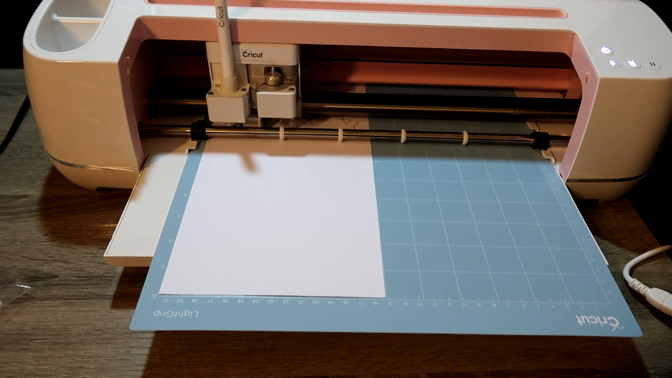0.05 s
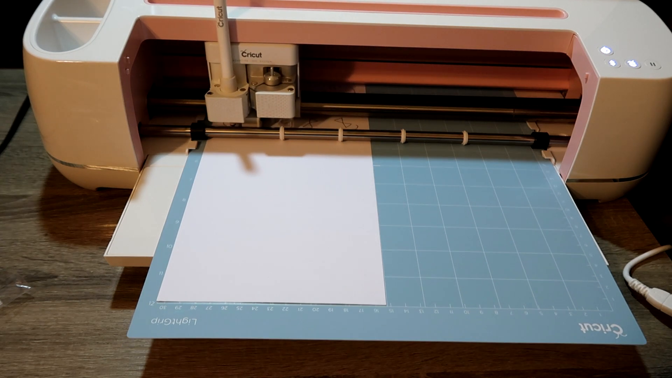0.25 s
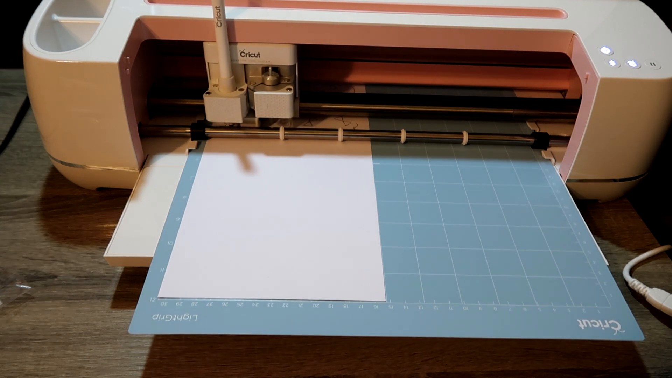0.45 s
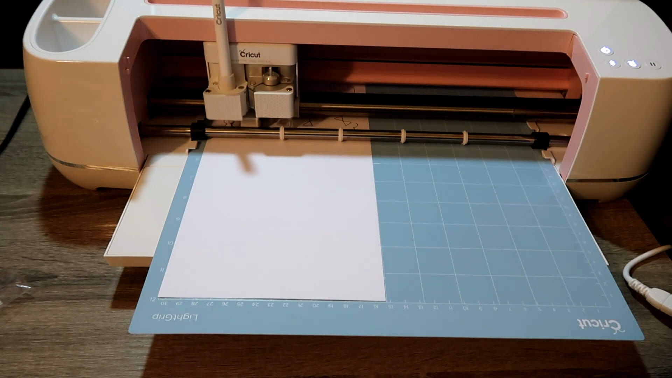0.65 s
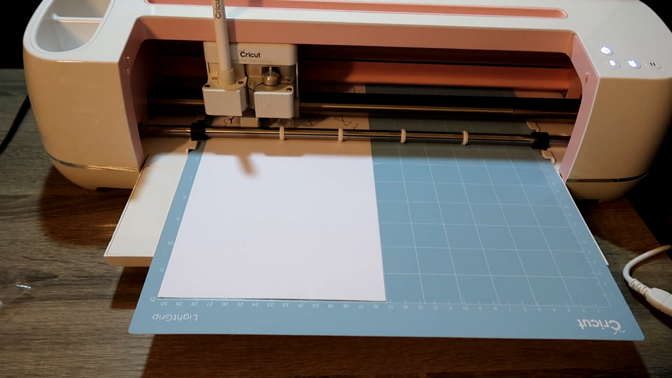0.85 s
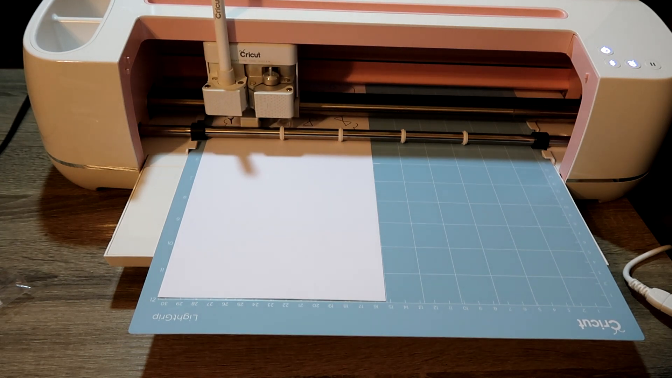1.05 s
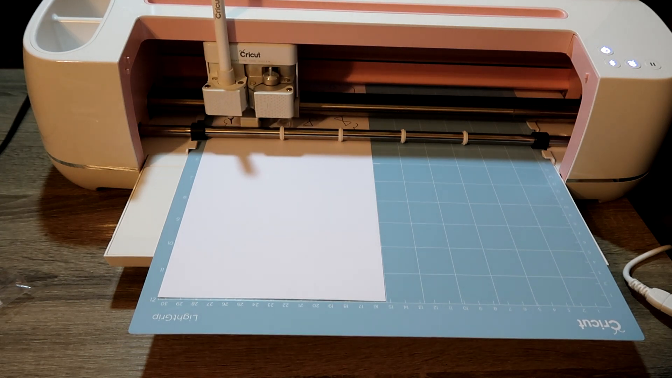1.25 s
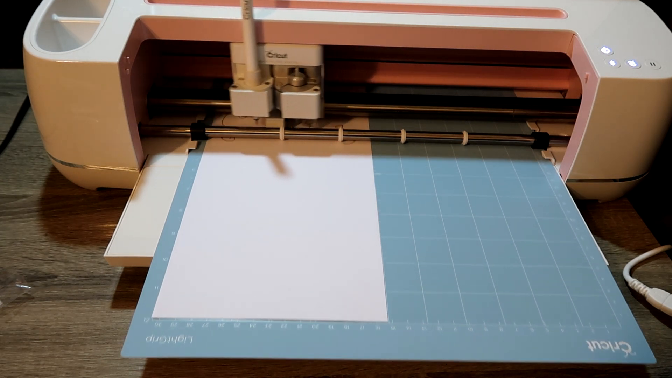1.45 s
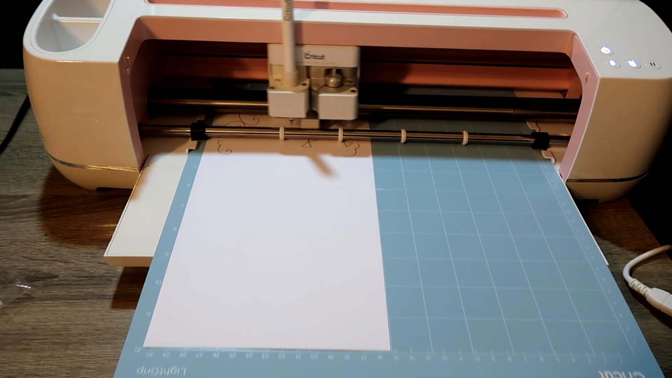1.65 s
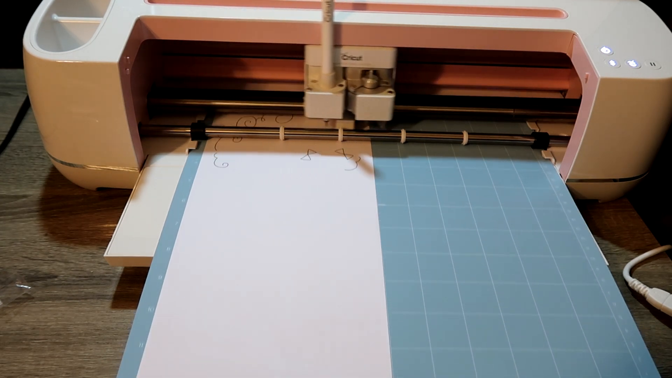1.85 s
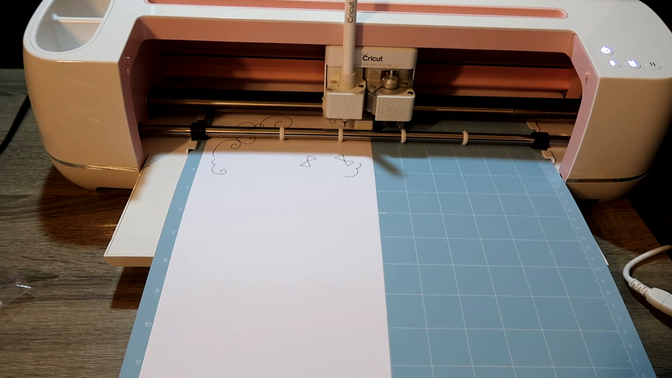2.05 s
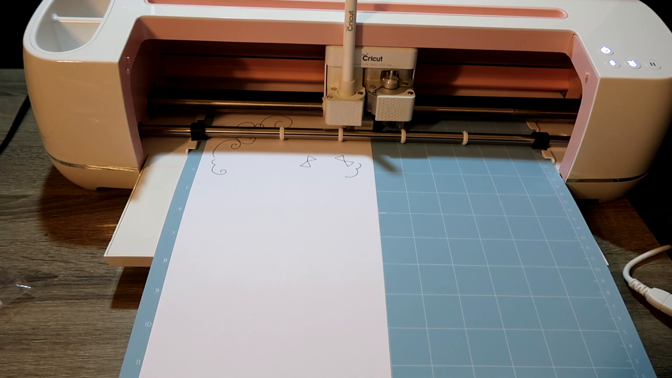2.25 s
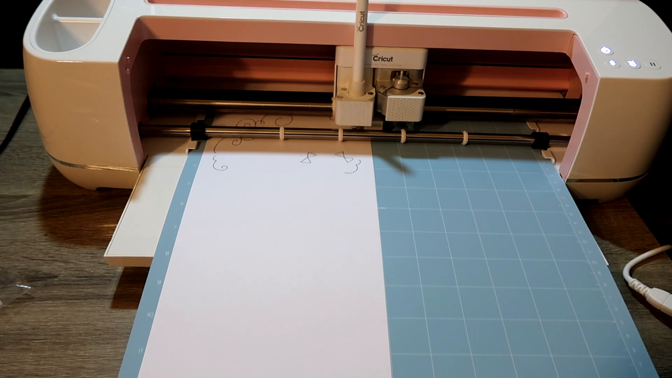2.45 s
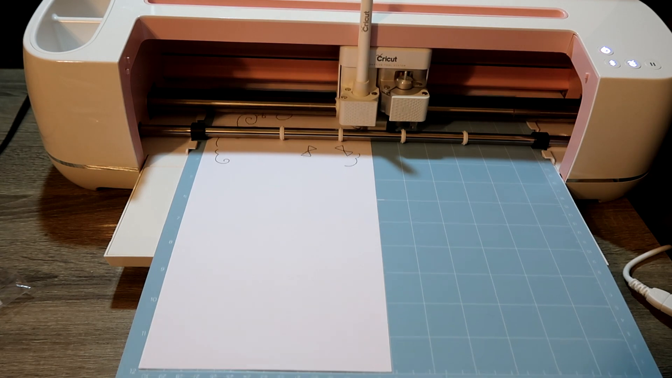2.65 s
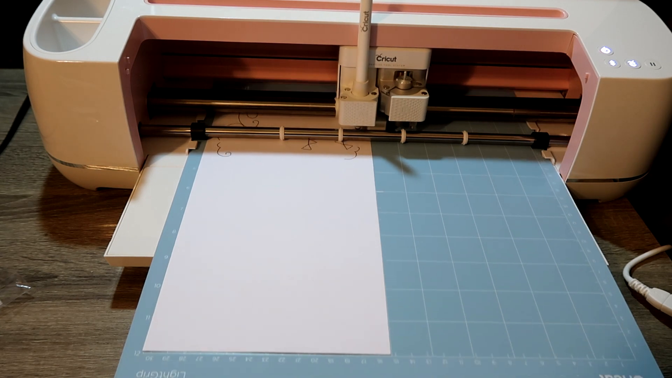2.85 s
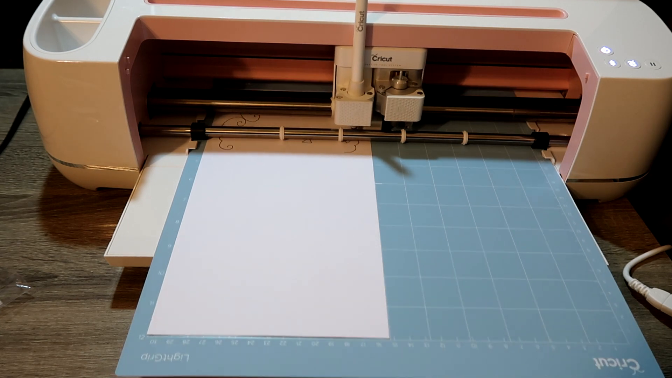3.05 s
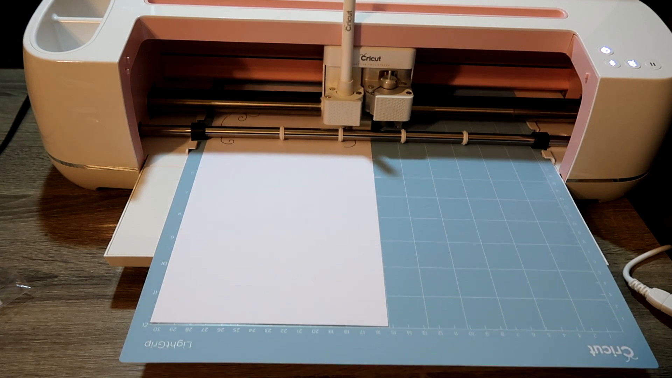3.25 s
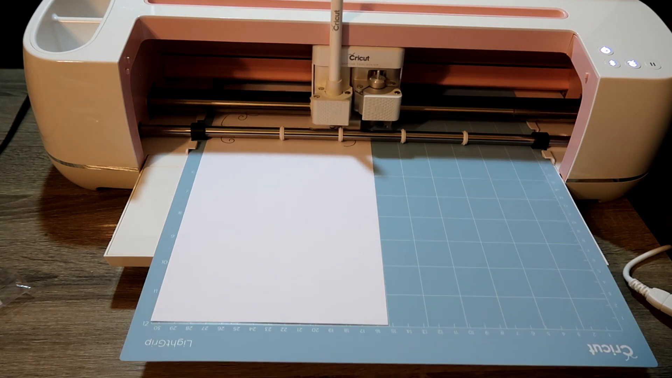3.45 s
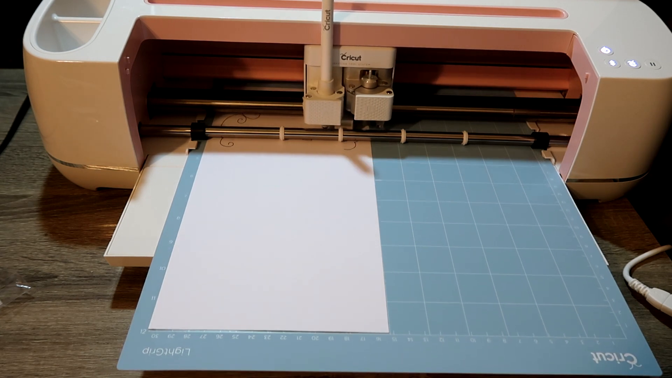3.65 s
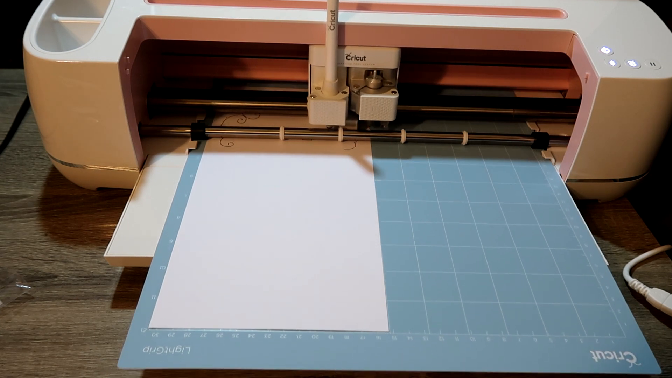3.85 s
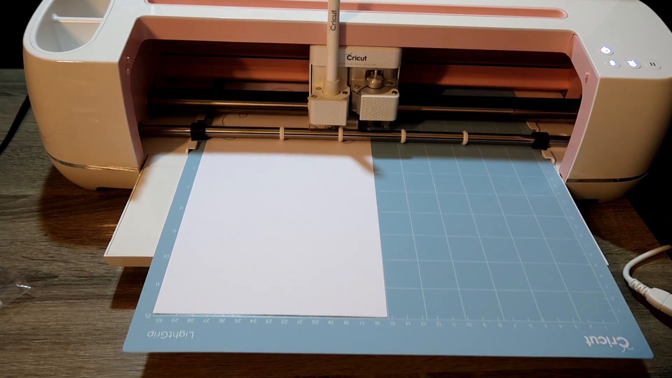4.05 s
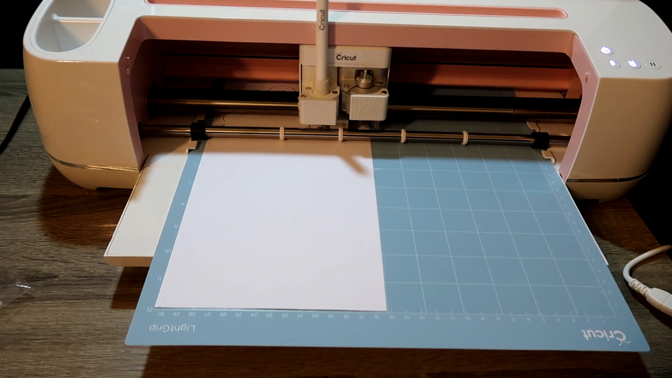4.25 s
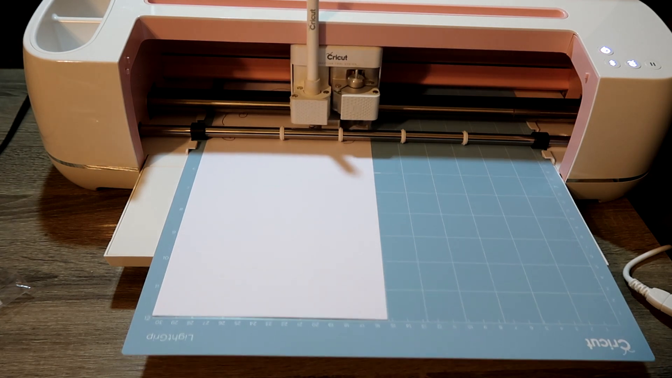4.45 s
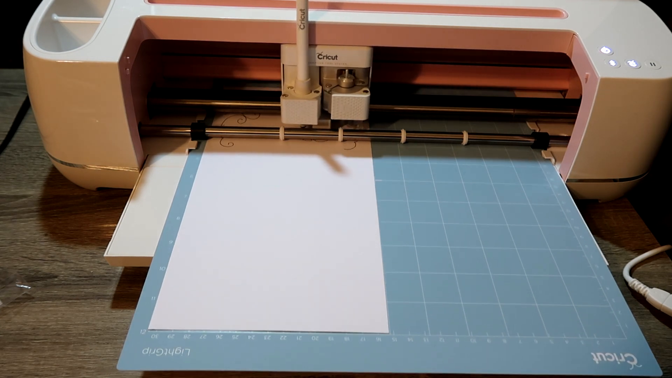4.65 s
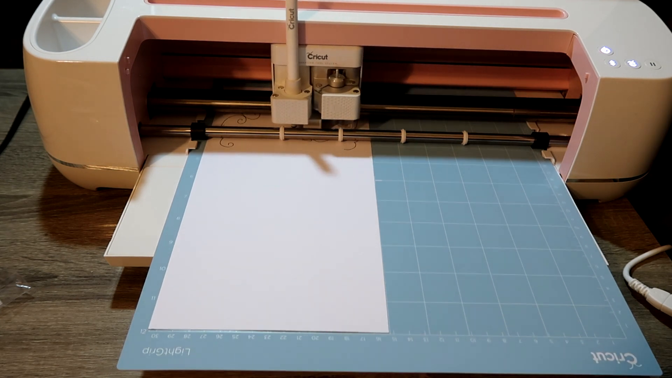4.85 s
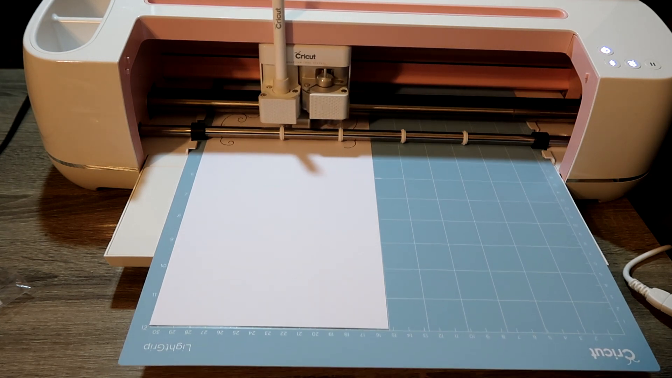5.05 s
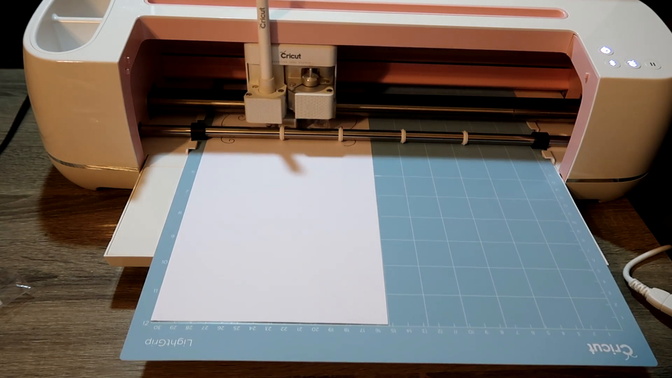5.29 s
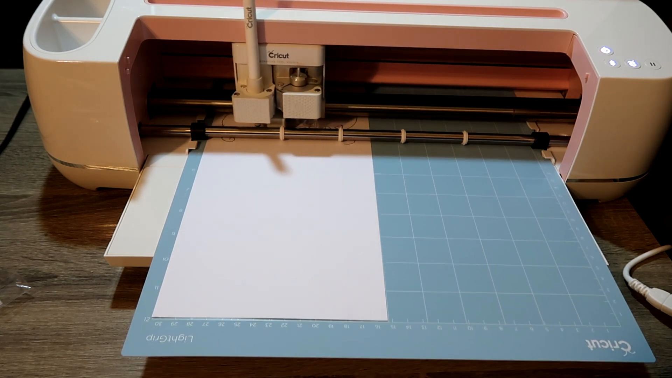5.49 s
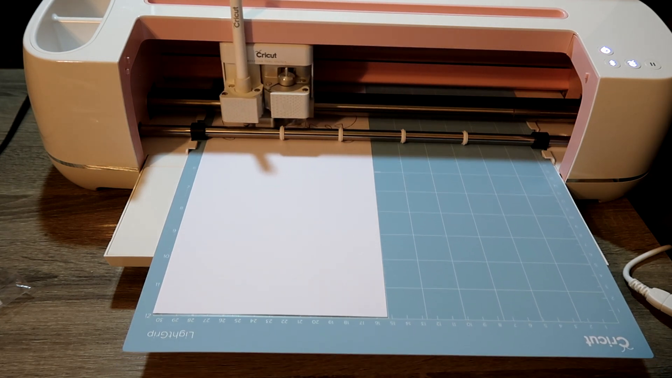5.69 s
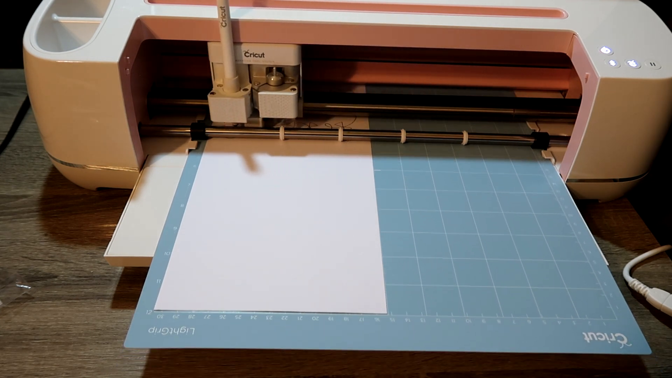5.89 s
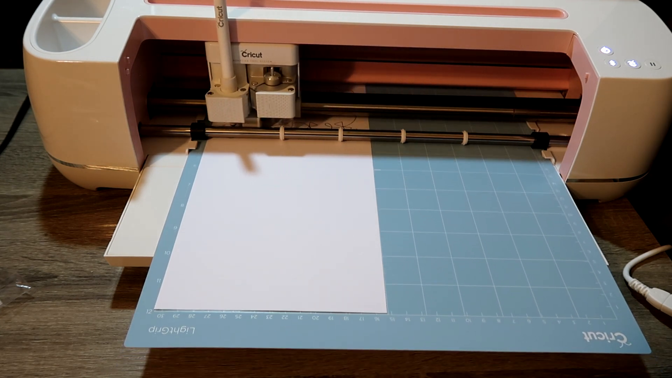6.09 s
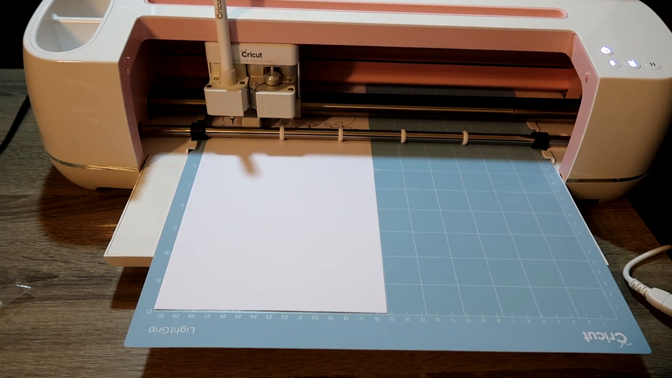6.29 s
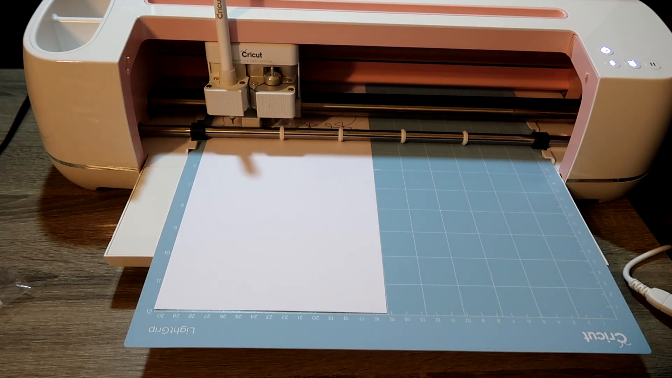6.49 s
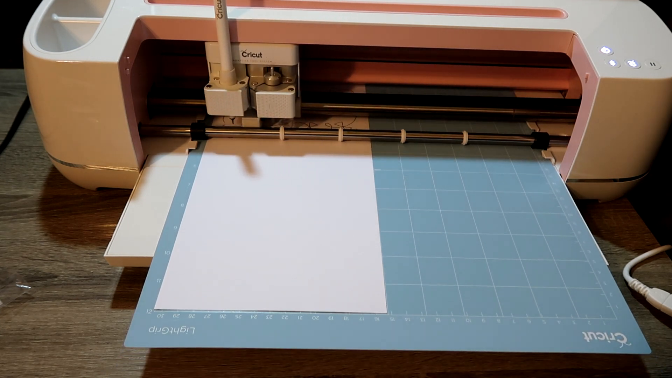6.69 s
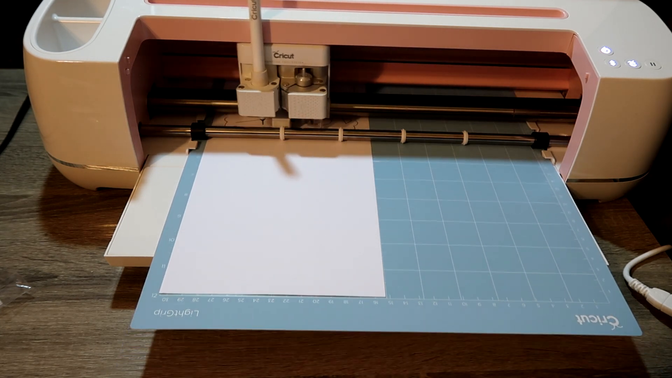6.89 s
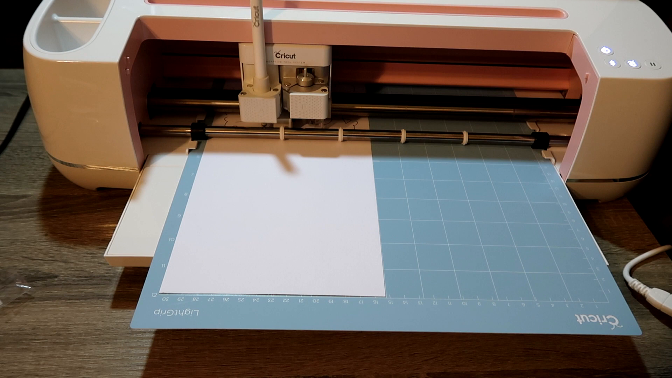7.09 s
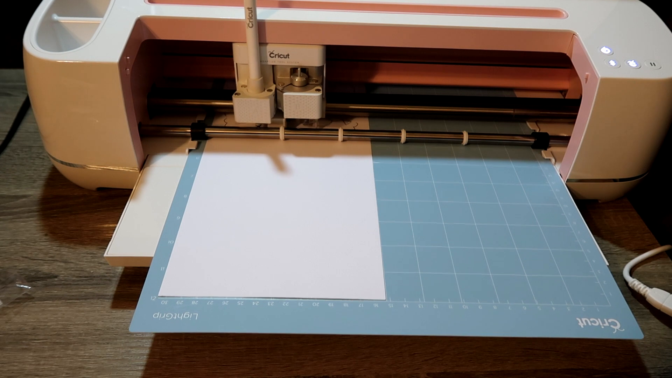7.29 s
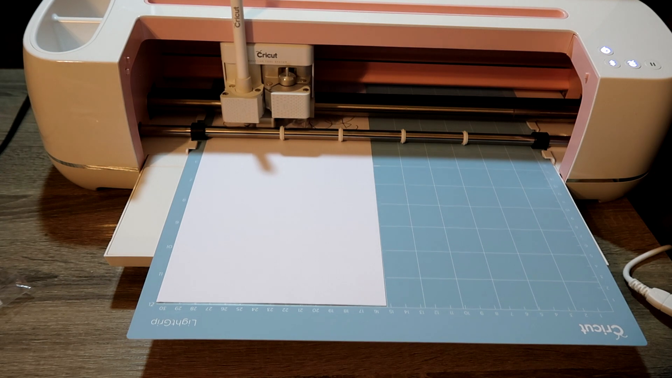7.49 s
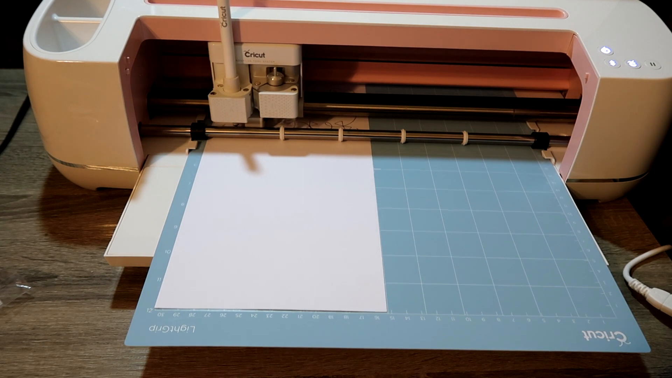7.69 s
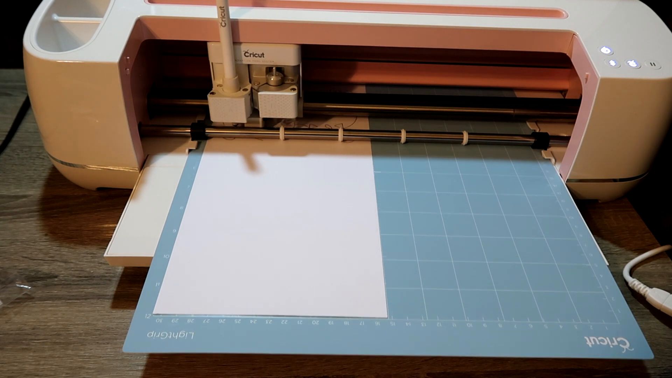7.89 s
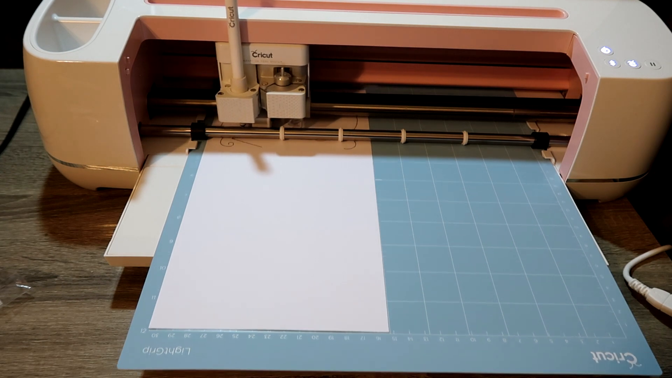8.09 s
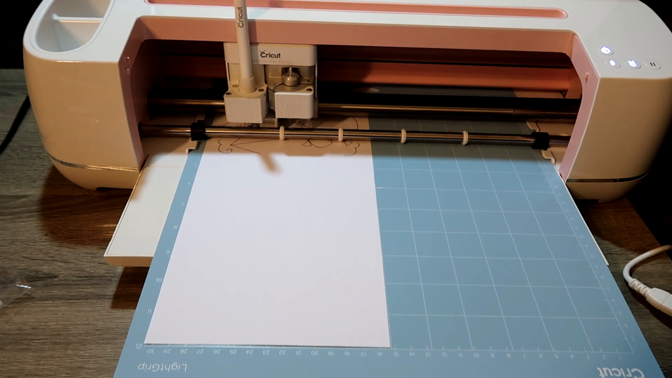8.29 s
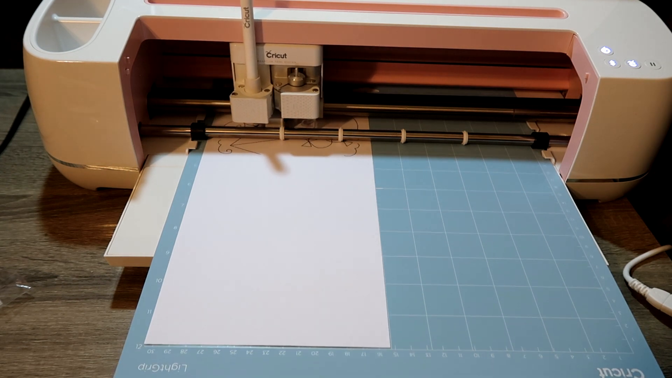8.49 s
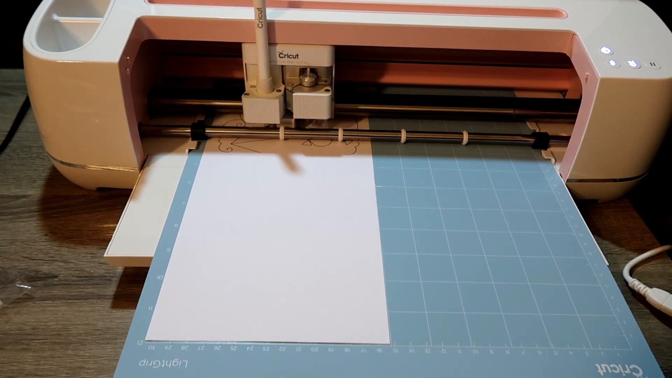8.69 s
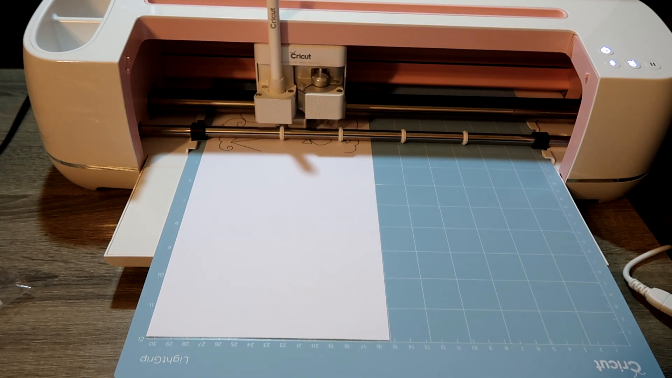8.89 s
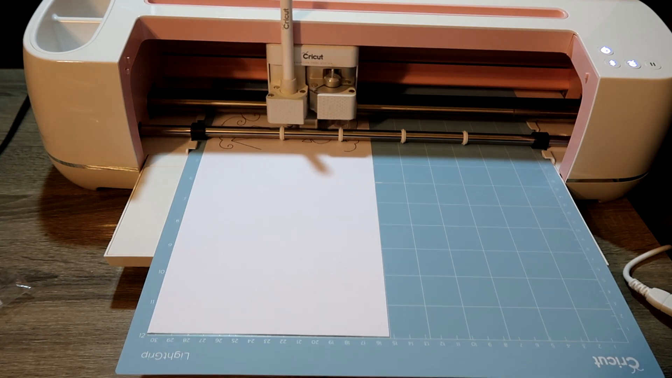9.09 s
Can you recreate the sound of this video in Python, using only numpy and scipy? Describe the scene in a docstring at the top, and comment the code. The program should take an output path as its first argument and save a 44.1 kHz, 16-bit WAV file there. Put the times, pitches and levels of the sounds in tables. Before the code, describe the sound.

Close up, small servo motors jog, whine loudly in a fast travel, then grind and purr through slower drawing strokes, punctuated by pen-holder clicks.

```python
"""A desktop cutting machine draws with a pen on a wooden table, heard from close by.
First the geared roller and carriage servos jog: teeth strike, rub and whine, and housings resonate.
Then a small motor hums as it lifts or lowers the clicking pen holder; this recurs between moves.
Fast travel leads to slower drawing, then a long carriage creep under which a panel hums; a short
travel and more drawing follow. Gear play knocks at the moves, and the idle room lies under all."""
import sys
import numpy as np
from scipy import signal
from scipy.fft import rfft, irfft
from scipy.io import wavfile
from scipy.ndimage import uniform_filter1d

SR = 44100
rng = np.random.default_rng(int(sys.argv[2]) if len(sys.argv) > 2 else 0)


def inscribe(sig):
    """Save sig as 16-bit PCM at rate SR to the path in sys.argv[1].

    A 1-D sig is mono; a 2-D sig holds one channel per row.
    Samples are clipped to [-1, 1] before scaling.
    """
    pcm = np.round(np.clip(np.atleast_2d(sig).T, -1, 1) * 32767)
    wavfile.write(sys.argv[1], SR, pcm.astype(np.int16))


N = 402633
TIME = np.arange(N) / SR

# shaft speeds: rollers drawing and travelling, carriage creeping and sliding
DRAW_HZ, TRAVEL_HZ, CREEP_HZ, SLIDE_HZ = 32.7, 62.28, 13.15, 40.52
TEETH = 11  # on each pinion
WHEEL_RATIO, TIGHT_SPOT_S = 5, 2.806  # pinion turns per big-wheel turn; a time at the tight spot
SHAKE_RELEASE_S = 0.036  # amplitude decay time of the case
ROD_HZ, ROD_WIDTH_HZ = 2956, 70  # guide rod resonance
LIFT_HUM_START_HZ, LIFT_HUM_END_HZ = 120.3, 178
ROOM_DB = -50.5
TOP_HZ = 15400  # upper band limit

# Roller and carriage motion: (start [s], end [s], speeding up [s], braking [s],
# top shaft speed [Hz], + out or right, - in or left, load [dB])
ROLLER_MOVES = [(0, .11, .01, .09, -12, -1), (.09, .33, .09, 0.078, 25, -1.5),
                (.35, .52, .06, 0.079, -18, -1), (1.32, 2.11, .11, 0.13, TRAVEL_HZ, -2),
                (2.34, 3.44, .125, 0.25, -DRAW_HZ, 0), (3.5, 3.83, .14, 0.083, 23, -2),
                (3.85, 4.31, .15, .17, -DRAW_HZ, -0.5), (4.35, 4.82, .15, .16, DRAW_HZ, 0.5),
                (6.39, 6.49, .035, .06, 7, -2), (6.785, 6.99, .1, 0.09, -62, -8.5),
                (7.26, 7.87, .07, .13, 15, -2.5), (7.87, 8.45, .11, 0.096, DRAW_HZ, 0)]
CARRIAGE_MOVES = [(0, .19, 0.0095, 0.06, CREEP_HZ, 1.5), (.2, .6, 0.11, .08, -7.5, -4.5),
                  (1.32, 2.11, 0.12, 0.13, SLIDE_HZ, 0.5), (3.2, 4.08, .13, .6, -CREEP_HZ, -1.5),
                  (4.08, 4.58, .12, .2, -CREEP_HZ, -2.5), (4.58, 4.82, .1, .11, -CREEP_HZ, 1),
                  (4.82, 6.04, .06, 0.086, -CREEP_HZ, -0.5), (6.02, 6.14, .05, 0.033, -7, -14),
                  (6.775, 6.998, 0.095, .09, 41.5, 6.5), (7.26, 7.88, 0.073, .13, -12, 0.5),
                  (8.44, 9.17, 0.098, 0.093, CREEP_HZ, 0.5)]
# Growth of each drive's loudness: (shaft speed [Hz], relative level [dB])
ROLLER_LOUDNESS = [(0, -61), (4, -44), (15, -33.5), (24, -27.5), (33, -25.5), (50, -18.5), (62, -20.5)]
CARRIAGE_LOUDNESS = [(0, -57.5), (4, -53.5), (13, -46), (26, -32.5), (40, -20), (44, -19.5)]
# Gear whine partials: (multiple of shaft speed, rounded in use [1], relative levels
# slow backward [dB], slow forward [dB], at full speed [dB])
ROLLER_WHINE = [(3, 13.5, 8, -10), (4, 5, -2, -18), (10, -25, -12.5, 3), (11, -3, 0, 5),
                (17, -2.5, 0.5, -2), (18, -25, -12, -0.5), (19, -4, -9, -16), (21, -25, -22, 4),
                (22, 3, -1.5, 12.5), (25, -5, -12.5, -21), (31, -16, -3, -6), (33, 6.5, 6.5, -6),
                (34, -6, -8, -9), (35, -18, -10, -5), (41, -6.5, -6.5, -12), (44, -24, 0.5, -14),
                (49, -24, -5.5, -4), (55, 1, -6, -5), (63.7, -19, 3, 8), (65.1, -4, -16, -8),
                (72.2, -26, -6, -4), (86.8, 0, -21, -9.5), (90.9, -3.5, -24, -5), (95.6, 1.5, -17.5, -10.5),
                (99, -10, -4.5, -9)]
CARRIAGE_WHINE = [(2, -32, -29, 0), (4, -22, -26, -9), (23, -19, -15, -23.5), (42, -14, -2, -21),
                  (44, -15.5, -28, -3), (45, -22, -12, -12.5), (48, -27, -18, -14.5), (49, -21, -4.5, -10),
                  (60, -12, -6.5, -9), (90.25, -11, -24, -21), (96.2, -15, -32, -8), (118.2, -6, -19, -17),
                  (137, -16, -10, -21), (141, -21, -11, -10), (149.5, -16, -3, -19.5),
                  (179.7, -4.5, -9, -26), (253, -8, -5, -22)]
# Spectral slopes of the drive housings: (frequency [Hz], level [dB])
ROLLER_SLOPE = [(50, -24.5), (130, -33), (350, -12.5), (470, -20.5), (750, -18), (950, -19.5),
                (1400, -17.5), (1600, -22), (1950, -27.5), (2300, -25), (3300, -33), (4000, -41),
                (7000, -52), (14000, -58.5)]
CARRIAGE_SLOPE = [(50, -33), (150, -18), (330, -2), (470, -8.5), (600, -5.5), (950, -7.5), (1300, 1),
                  (1560, -5), (1950, -9.5), (2100, -10.5), (2400, -12), (3300, -20.5), (4500, -28.5),
                  (6300, -37), (9000, -37), (14000, -46)]
# Resonances of the drive housings: (frequency [Hz], width [Hz], rise [dB])
ROLLER_MODES = [(597, 160, 3.3), (800, 40, 6), (1111, 152, 11.93), (1196, 166, 10.7), (1380, 160, 5.8),
                (2940, 265, 6.2), (4000, 94, 5.8), (4670, 460, 7.9), (5630, 420, 10.4), (8700, 1200, 4.2)]
CARRIAGE_MODES = [(604, 155, 6.4), (797, 36, 4.4), (1139, 96, 8.2), (1395, 50, 6), (1703, 110, 7.9),
                  (1841, 133, 9), (1966, 82, 6.2), (3300, 400, 6.9), (4700, 420, 7.9)]

# Pen lift strokes: (start [s], end [s], nominal gear pitch [Hz], tone level [dB],
# case shaking, also the base of the hum level [dB])
LIFTS = [(.745, 0.901, 580, -40.5, -37.5), (2.13, 2.256, 615, -43, -37), (6.26, 6.44, 580, -41, -40.5),
         (7.05, 7.198, 625, -35.5, -36.5)]
# Pen holder snaps: (time [s], relative level [dB], gain above the treble corner [dB])
CLICKS = [(0.6961, -15, 2), (0.759, -31, -17), (2.161, -25, -14), (2.172, -22, -22), (2.184, -25.5, -10),
          (2.247, -30, 2), (2.2569, -30, 12), (6.2378, -15, 0), (6.348, -33.5, -8), (7.082, -22, -19),
          (7.093, -26, -9), (7.104, -24, -17), (7.177, -24.5, -2), (7.239, -40, 13)]
# Spectral slope of the holder: (frequency [Hz], level [dB])
CLICK_SLOPE = [(200, -22), (700, -9), (1200, -9), (2000, 5), (3200, 0), (4500, -7), (5600, -8.5),
               (7000, -11.5), (10000, -22.5), (15000, -23.5)]
# Resonances and dips of the holder: (frequency [Hz], width [Hz], rise [dB])
CLICK_MODES = [(2410, 290, -13), (3350, 590, 7.5), (6200, 700, 0.5)]
# Metal modes of the pen clamp: (frequency [Hz], level [dB], 60 dB decay time [s])
CLAMP_MODES = [(1840, -11.5, 0.078), (2800, -6, 0.071), (3240, 1, 0.018), (3710, -14, 0.037),
               (4240, -3, 0.039), (4550, -5, 0.052), (6200, -12, .04)]
# Gear play closing or pen landing: (time [s], relative level [dB],
# relative clack level [dB], guide rod level re the base [dB])
KNOCKS = [(0.088, -33, 1, -13), (0.668, -30.5, 0.5, -25), (0.703, -22, -26, -33), (1.312, -32, -5, -25),
          (2.146, -21.5, -4.5, -18), (2.315, -31.5, 7.5, -9), (3.831, -22, -3.5, -15),
          (4.042, -35, 13.5, -5), (4.845, -22.5, 1, -17), (6.205, -24, -1, -14), (6.246, -23, -17, -30),
          (6.745, -36, -1, -29), (6.779, -18, -3, -5), (7.058, -22.5, -3.5, -12), (7.244, -21, -21, -35),
          (7.85, -27, -15, -33), (8.436, -20.5, -16, -32)]
# Spectral slopes of the hollow thud and the hard clack: (frequency [Hz], level [dB])
THUD_SLOPE = [(80, -25), (150, -4.5), (320, -2), (450, -4.5), (600, 5.5), (820, -5), (1100, -11),
              (2000, -18.5), (6000, -51)]
CLACK_SLOPE = [(500, -50.5), (1200, 14), (1600, -2.5), (2000, -1), (3000, -5.5), (4500, -15.5), (8000, -29),
               (15000, -37.5)]
# Resonances of the clack: (frequency [Hz], width [Hz], rise [dB])
CLACK_MODES = [(2360, 200, 10), (2700, 360, 8.5)]
# Pen holder weight striking the table: (time [s], relative level [dB])
THUMPS = [(.704, -18), (6.247, -25), (7.243, -21)]
# Modes of the case and table top: (frequency [Hz], level [dB], 60 dB decay time [s])
THUMP_MODES = [(129, -5, .16), (192, -4, 0.1), (327, -2, 0.075), (413, -2, .06)]
# Brief bursts ringing the roller housing: (time [s], peak level [dB])
ROLLER_BURSTS = [(.244, -16.5), (0.407, -26), (1.375, -21), (2.001, -10), (4.065, -18), (4.437, -29),
                 (6.856, -12.5), (6.919, -7.5), (8.209, -21)]
# Spectral slope of those bursts: (frequency [Hz], level [dB])
CHATTER_SLOPE = [(300, -40.5), (1250, 0.5), (2500, -30), (8000, -57)]
# Servo inching onto its end point: (start [s], end [s], level [dB])
SETTLING = [(0.475, 0.6, -45.5), (0.62, .67, -42.5), (.865, 0.898, -48), (1.32, 1.352, -43),
            (6.054, 6.128, -43), (6.154, 6.2, -47), (6.42, 6.465, -52)]
# Spectral slope of the motor mount: (frequency [Hz], level [dB])
SETTLE_SLOPE = [(300, -14), (600, 9), (900, -28), (1300, 0), (2000, -27), (2700, -13), (4000, -26),
                (12000, -50)]
# Resonances of the motor mount: (frequency [Hz], width [Hz], rise [dB])
SETTLE_MODES = [(1340, 260, 4.5), (1570, 170, 12), (2445, 200, 8), (2640, 220, 7)]

# Servos powered, trembling even at a standstill: (on [s], off [s])
POWERED = [(0, 0.61), (.66, 0.93), (1.31, 2.3), (2.32, 6.1), (6.17, 6.44), (6.745, 7.3), (7.24, 9.5)]
# Spectral slope of the case on the table: (frequency [Hz], level [dB])
CASE_SLOPE = [(40, -32.5), (75, -15), (100, -6.5), (125, -5), (240, -12.5), (330, -5.5), (460, -13.5),
              (750, -15.5), (1000, -22.5), (2000, -24.5), (4000, -45), (12000, -54)]
# Resonances of the case on the table: (frequency [Hz], width [Hz], rise [dB])
CASE_MODES = [(138.5, 18, 3), (198, 65, 9.55), (311, 27, 4.6), (566, 61, 13), (827, 56, 7.8)]
# Panel humming along on the long slide: (start [s], end [s], frequency [Hz], level [dB])
PANEL = (5, 6, 256.5, -44)
# Spectral slope of the idle room: (frequency [Hz], relative level [dB])
ROOM_SLOPE = [(28, -16), (40, 10), (60, -11), (130, -6.5), (260, -10.5), (325, -6), (450, -13.5),
              (1100, -18.5), (3500, -25), (10000, -37.5), (15000, -51)]
# Whistle of the motor drivers: (frequency [Hz], mean level [dB])
WHISTLE = [(13001, -76), (14998, -73.5)]
# Spectral slope of the sideways reflections: (frequency [Hz], relative level [dB])
WIDTH_SLOPE = [(40, -19.5), (100, -35), (300, -15), (600, -20), (1200, -17), (2500, -11), (5000, -2.5),
               (8000, -2.5), (11000, 2.5), (14000, -19)]


def undb(db):
    """Level law: decibels to amplitude ratio."""
    return 10 ** (np.asarray(db) / 20)


def unit(x):
    """Normalization to rms 1."""
    return x / np.sqrt(np.mean(x ** 2) + 1e-20)


def walk(rate):
    """Band-limited chance: smoothed random points, rate per second, rms 1."""
    k = max(int(SR / rate), 2)
    points = rng.standard_normal(N // k + 2)
    line = np.interp(np.arange(N) / k, np.arange(N // k + 2), points)
    return unit(uniform_filter1d(line, k))


def body(slope, modes=()):
    """Minimum phase: impulse response of a sloping spectrum with resonances on it."""
    size = 8192
    f = np.maximum(np.arange(size // 2 + 1) * SR / size, 1)
    hz, db = np.transpose(slope)
    db = np.interp(np.log(f), np.log(hz), db)
    for centre, width, rise in modes:
        db = db + rise / (1 + (2 * (f - centre) / width) ** 2)
    # folding the cepstrum onto positive times makes the response causal
    cepstrum = irfft(np.log(undb(db)))
    cepstrum[1:size // 2] *= 2
    cepstrum[size // 2 + 1:] = 0
    return irfft(np.exp(rfft(cepstrum)))[:size // 2]


def ring(x, response):
    """Linear superposition: convolve a sound with an impulse response."""
    return signal.oaconvolve(x, response)[:len(x)]


def tail(t60):
    """Diffuse decay: dense reflections dying exponentially, with unit energy."""
    t = TIME[:SR // 2]
    y = rng.standard_normal(len(t)) * np.exp(-np.log(1000) * t / t60)
    return y / np.linalg.norm(y)


def add(out, start, sound):
    """Superposition: mix a sound in at a time in seconds."""
    i = max(int(start * SR), 0)
    out[i:i + len(sound)] += sound[:N - i]


def during(spans):
    """Gating: 1 within the rows' start and end times, else 0."""
    return sum(1. * (TIME >= start) * (TIME < end) for start, end, *_ in spans)


def drive(moves, loudness):
    """Uniform acceleration: shaft speed, speed-dependent gain and direction (1 forward)."""
    hz, gain, forward = np.zeros(N), np.zeros(N), np.zeros(N)
    for start, end, up_s, brake_s, top_hz, load_db in moves:
        ramp = np.minimum((TIME - start) / up_s, (end - TIME) / brake_s)
        speed = abs(top_hz) * np.clip(ramp, 0, 1)
        forward[speed > hz] = top_hz > 0
        hz = np.maximum(hz, speed)
        level_db = np.interp(speed, *np.transpose(loudness)) + load_db
        gain = np.maximum(gain, np.minimum(speed, 1) * undb(level_db))
    return hz, gain, forward


def shaft(hz, slow_hz, fast_hz, hunt):
    """Phase integration: turns of a servo hunting about its set speed, and nearness to full (0-1)."""
    turns = np.cumsum(np.maximum(hz * (1 + hunt * walk(35)), 0)) / SR
    return turns, np.clip((hz - slow_hz) / (fast_hz - slow_hz), 0, 1)


def gear_rattle(turns, wear_db, scatter_db, strike_db, grit_db):
    """Impact and friction of teeth: worn faces repeat every turn, loose grit does not."""
    mesh, step = turns * TEETH, np.gradient(turns)
    tooth = mesh.astype(int)
    wear, chance = rng.standard_normal(TEETH), rng.standard_normal(N // 20)
    wear = wear_db * (wear - wear.mean()) / wear.std()
    force = undb(wear)[tooth % TEETH] * undb(scatter_db * chance)[tooth]
    # dividing by the root of the tooth rate evens the strikes' power over speed
    strikes = np.diff(tooth, prepend=tooth[0]) / np.sqrt(np.maximum(TEETH * step, 60 / SR))
    size = 1200  # roughness points around the pinion
    faces = unit(irfft(np.exp(2j * np.pi * rng.random(size // 2 + 1))))
    rub = np.interp(turns * size, np.arange(size), faces, period=size) * np.sqrt(step * size)
    grit = undb(grit_db) * rng.standard_normal(N)
    contact = unit(np.exp(-(mesh % 1)))  # pressure eases as the tooth rolls out
    return unit(force) * (undb(strike_db) * strikes + contact * (rub + grit))


def gear_whine(turns, fast, forward, orders, waver_db):
    """Harmonic excitation: shaft multiples whose balance shifts with tooth flank and load at speed."""
    out = 0
    for order, back_db, forward_db, fast_db in orders:
        slow_db = back_db + forward * (forward_db - back_db)
        gain = undb(slow_db + fast * (fast_db - slow_db) + waver_db * walk(22))
        out = out + gain * np.sin(2 * np.pi * (round(order) * turns + rng.random()))
    return np.sqrt(2) * out


def throb(turns, runout_db, uneven_db):
    """Eccentric modulation: an off-centre pinion presses harder once a turn, unevenly."""
    return unit(undb(runout_db * np.cos(2 * np.pi * turns) + uneven_db * walk(70)))


def wheel_beat(turns, beat_db, easy_db):
    """Amplitude modulation once a pinion turn, deepest as the big wheel's tight spot comes round."""
    angle = 2 * np.pi * (turns - np.interp(TIGHT_SPOT_S, TIME, turns))
    tight = np.cos(angle / WHEEL_RATIO / 2) ** 4
    depth_db = easy_db + (beat_db - easy_db) * tight
    return unit(undb(depth_db * (np.cos(angle) - .5)))


def rollers(hz, gain, forward):
    """Forced resonance: the mat drive sings in its housing, more evenly as teeth stay in contact."""
    turns, fast = shaft(hz, DRAW_HZ, TRAVEL_HZ, hunt=.002)
    # below drawing speed the loose teeth rattle more than they sing
    settled = np.clip(hz / DRAW_HZ, 0, 1)
    rattle = gear_rattle(turns, wear_db=-0.7, scatter_db=2.0, strike_db=-7.5, grit_db=0)
    rattle = rattle * undb(14.5 - 4.2 * fast)
    whine = gear_whine(turns, fast, forward, ROLLER_WHINE, waver_db=2.0)
    whine = whine * undb(1 - 8.3 * (1.5 - settled))
    beat_share = (1 - 0.92 * fast) * (1 - 0.5 * forward)
    beat = wheel_beat(turns, beat_db=5.5, easy_db=-0.5) ** beat_share
    load = throb(turns, runout_db=0.2, uneven_db=0.23) * beat
    return ring((rattle + whine) * load * gain, body(ROLLER_SLOPE, ROLLER_MODES))


def harden(x, amount, corner_hz):
    """Contact stiffness: faster contacts are harder and lose a share (0-1) of their bass."""
    bass = signal.sosfilt(signal.butter(1, corner_hz, fs=SR, output="sos"), x)
    return x - np.clip(amount, 0, 1) * bass


def carriage(hz, gain, forward, wander):
    """Frequency modulation: the belt drive purrs unsteadily at a creep and whines steadily at speed."""
    creeping = np.clip((SLIDE_HZ - hz) / (SLIDE_HZ - CREEP_HZ), 0, 1)
    turns, fast = shaft(hz * (1 + wander * creeping * walk(14)), CREEP_HZ, SLIDE_HZ, hunt=.003)
    rattle = gear_rattle(turns, wear_db=0.5, scatter_db=1.5, strike_db=-14.5, grit_db=-2.0)
    rattle = harden(rattle * undb(13.5 - 3.27 * fast), 0.53 * fast, corner_hz=1200)
    whine = gear_whine(turns, fast, forward, CARRIAGE_WHINE, waver_db=3.5)
    load = throb(turns, runout_db=0.2, uneven_db=2.5)
    return ring((rattle + whine) * load * gain, body(CARRIAGE_SLOPE, CARRIAGE_MODES))


def pen_lift(rough, buzz_db, hum_db):
    """Rotating excitation: a motor spins up and down with a rough tone, a rising case hum and a buzz."""
    out, wobble = np.zeros(N), walk(90)
    grit = unit(ring(rng.standard_normal(N), body(THUD_SLOPE)))
    for start, end, hz, db, case_db in LIFTS:
        span = slice(int(start * SR), int(end * SR))
        stroke = np.linspace(0, 1, len(TIME[span]))
        speed = np.sin(np.pi * stroke).clip(0) ** .5
        tone_hz = hz * (0.94 + 0.0834 * speed + rough * wobble[span])
        tone = np.sin(2 * np.pi * np.cumsum(tone_hz) / SR)
        hum_hz = LIFT_HUM_START_HZ + (LIFT_HUM_END_HZ - LIFT_HUM_START_HZ) * stroke
        hum = np.sin(2 * np.pi * np.cumsum(hum_hz * (1 + rough * wobble[span])) / SR)
        buzz = undb(buzz_db) * grit[span] * (1 + hum)
        add(out, start, speed * (undb(db) * (tone + buzz) + undb(case_db + hum_db) * hum))
    return out


def blow(response, contact_s, t60, late_t60, late_db):
    """Impact on plastic: the contact builds up, cracks and leaves a late ring; peak 1."""
    crack = tail(t60) + undb(late_db) * tail(late_t60)
    onset = 1 - np.exp(-(TIME[:len(crack)] / contact_s) ** 2)
    y = ring(crack * onset, response)
    return y / np.abs(y).max()


def struck(modes):
    """Free modal vibration: a sum of clean decaying modes; peak 1."""
    t = TIME[:SR // 4]
    y = sum(undb(db) * np.exp(-np.log(1000) * t / t60) * np.sin(2 * np.pi * hz * t)
            for hz, db, t60 in modes)
    return y / np.abs(y).max()


def pen_clicks(db, clamp_db, lag_s):
    """Hard impact: the holder snaps against its stops, sharper ones brighter, and its clamp rings."""
    out, holder = np.zeros(N), body(CLICK_SLOPE, CLICK_MODES)
    treble = signal.butter(1, 7000, "high", fs=SR, output="sos")
    for start, level_db, top_db in CLICKS:
        click = blow(holder, contact_s=0.002, t60=0.026, late_t60=0.058, late_db=-7.0)
        top = signal.sosfilt(treble, click)
        add(out, start, undb(level_db + db) * (click + (undb(top_db) - 1) * top))
        add(out, start + lag_s, undb(level_db + clamp_db) * struck(CLAMP_MODES))
    return out


def gear_knocks(thud_db, clack_db):
    """Backlash impact: closing gear play gives a hollow thud, a clack and a guide rod ring."""
    out, case, gears = np.zeros(N), body(THUD_SLOPE), body(CLACK_SLOPE, CLACK_MODES)
    t = TIME[:SR // 10]
    rod = np.exp(-np.pi * ROD_WIDTH_HZ * t) * np.sin(2 * np.pi * ROD_HZ * t)
    for start, level_db, hard_db, rod_db in KNOCKS:
        thud = blow(case, contact_s=0.0019, t60=0.14, late_t60=0.14, late_db=-10.0)
        clack = blow(gears, contact_s=0.0016, t60=0.028, late_t60=0.18, late_db=-4.5)
        ping = blow(rod, contact_s=0.00069, t60=0.1, late_t60=0.15, late_db=-14.0)
        knock = undb(thud_db) * thud + undb(hard_db + clack_db) * clack + undb(rod_db) * ping
        add(out, start, undb(level_db) * knock)
    return out


def table_thumps():
    """Modal response to impact: a dropped pen holder sets the case and table top ringing."""
    out = np.zeros(N)
    for start, level_db in THUMPS:
        add(out, start, undb(level_db) * struck(THUMP_MODES))
    return out


def roller_bursts():
    """Resonant excitation: brief bursts of contact ring the roller housing."""
    out, housing = np.zeros(N), body(CHATTER_SLOPE, ROLLER_MODES)
    for start, peak_db in ROLLER_BURSTS:
        burst = blow(housing, contact_s=0.0021, t60=0.08, late_t60=0.078, late_db=-6.5)
        add(out, start, undb(peak_db) * burst)
    return out


def settling_buzz(shaft_hz, fade_s):
    """Resonant filtering of rattle: quick small servo corrections buzz in the motor mount."""
    turns = np.cumsum(shaft_hz * (1 + 0.027 * walk(25))) / SR
    rattle = gear_rattle(turns, wear_db=-0.5, scatter_db=-0.5, strike_db=-0.5, grit_db=-13.0)
    buzz = unit(ring(rattle, body(SETTLE_SLOPE, SETTLE_MODES)))
    return buzz * sum(undb(db) * np.clip(np.minimum(TIME - start, end - TIME) / fade_s, 0, 1)
                      for start, end, db in SETTLING)


def cogging(hz, full_hz, db, wander, waver_db, highest):
    """Torque ripple: low multiples of the shaft speed hum in the case and glide with every move."""
    turns = np.cumsum(hz * (1 + wander * walk(14))) / SR
    torque = sum(undb(waver_db * walk(16)) * np.sin(2 * np.pi * (k * turns + rng.random()))
                 for k in range(3, highest + 1))
    torque = torque * np.sqrt(np.minimum(hz / full_hz, 1))
    return undb(db) * unit(ring(torque, body(CASE_SLOPE, CASE_MODES)))


def shake(roller_hz, carriage_hz, hold_db, roller_db, carriage_db):
    """Power addition: each motor adds case vibration in step with its speed, then it dies away."""
    lifting = sum(undb(db) ** 2 * during([(start, end)]) for start, end, *_, db in LIFTS)
    holding = undb(hold_db) ** 2 * during(POWERED)
    rolling = undb(roller_db) ** 2 * roller_hz / DRAW_HZ
    sliding = undb(carriage_db) ** 2 * carriage_hz / CREEP_HZ
    power = holding + lifting + rolling + sliding
    keep = np.exp(-2 / (SHAKE_RELEASE_S * SR))  # power decays twice as fast as amplitude
    return np.sqrt(np.maximum(power, signal.lfilter([1 - keep], [1, -keep], power)))


def case_rumble(strength, jolts_per_s):
    """Random impulse excitation: small servo jolts drum on the hollow case and the table."""
    jolts = (rng.random(N) < jolts_per_s / SR) * rng.standard_normal(N)
    return unit(ring(jolts, body(CASE_SLOPE, CASE_MODES))) * strength


def panel_hum(waver_db):
    """Sympathetic vibration: one wavering panel tone swells and fades."""
    start, end, hz, db = PANEL
    swell = np.sqrt(np.sin(np.pi * np.clip((TIME - start) / (end - start), 0, 1)).clip(0))
    gain = swell * undb(db + waver_db * walk(15))
    return gain * np.sqrt(2) * np.sin(2 * np.pi * hz * TIME + walk(15))


def idle():
    """Stationary background: filtered room noise and the thin whistle of the motor drivers."""
    whistle = sum(undb(db + 2 * walk(30)) * np.sqrt(2) * np.sin(2 * np.pi * hz * TIME)
                  for hz, db in WHISTLE)
    return undb(ROOM_DB) * unit(ring(rng.standard_normal(N), body(ROOM_SLOPE))) + whistle


def scene():
    """Superposition and early reflection: a central machine, thickened and widened in the treble."""
    roller_hz, roller_gain, outward = drive(ROLLER_MOVES, ROLLER_LOUDNESS)
    carriage_hz, carriage_gain, rightward = drive(CARRIAGE_MOVES, CARRIAGE_LOUDNESS)
    machine = rollers(roller_hz, roller_gain, outward)
    machine += carriage(carriage_hz, carriage_gain, rightward, wander=.018)
    machine += pen_lift(rough=0.032, buzz_db=-13.0, hum_db=3.5)
    machine += pen_clicks(db=-0.5, clamp_db=-5.5, lag_s=.002)
    machine += gear_knocks(thud_db=1.0, clack_db=0.5)
    machine += table_thumps() * undb(-0.5)
    machine += roller_bursts()
    machine += settling_buzz(shaft_hz=24.4, fade_s=0.01)
    machine += cogging(roller_hz, DRAW_HZ, db=-46, wander=0.00199, waver_db=4.5, highest=12)
    machine += cogging(carriage_hz, CREEP_HZ, db=-45, wander=.018, waver_db=4.0, highest=33)
    shaking = shake(roller_hz, carriage_hz, hold_db=-39.5, roller_db=-38.5, carriage_db=-43)
    machine += case_rumble(shaking, jolts_per_s=1500)
    machine += panel_hum(waver_db=4.0)
    mid = machine + undb(-8.5) * ring(machine, tail(t60=0.27)) + idle()
    side = undb(-1.0) * ring(ring(mid, tail(t60=0.082)), body(WIDTH_SLOPE))
    return np.array([mid + side, mid - side])


def record(dry):
    """Saturation and band limiting: the loudest peaks are rounded and the top is cut."""
    dry = dry / (1 + (dry / .78) ** 4) ** .25
    return signal.sosfilt(signal.ellip(8, .2, 70, TOP_HZ, fs=SR, output="sos"), dry)


dry = scene()
out = record(dry)
inscribe(out)
```